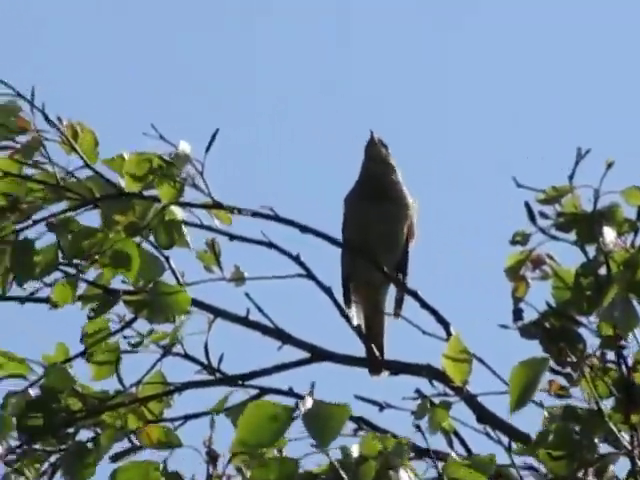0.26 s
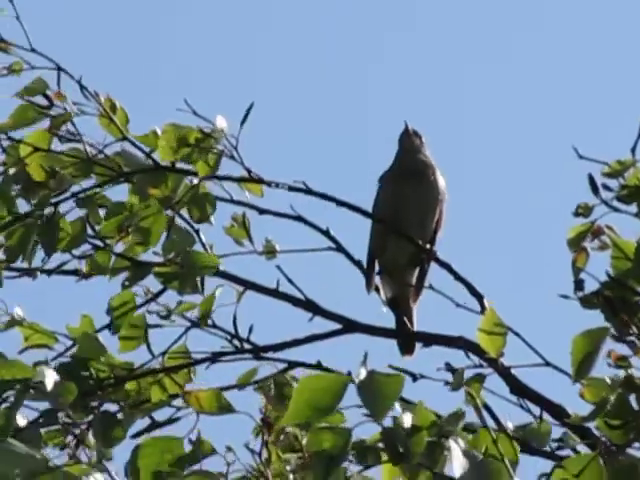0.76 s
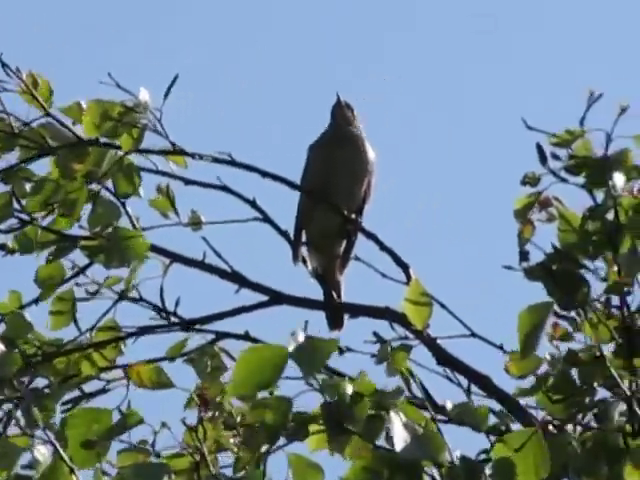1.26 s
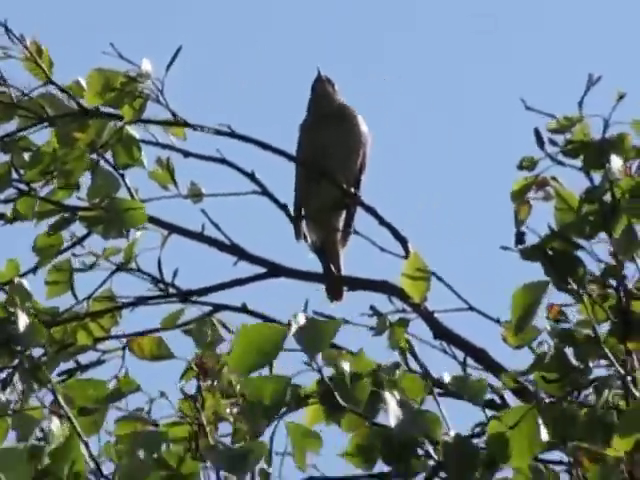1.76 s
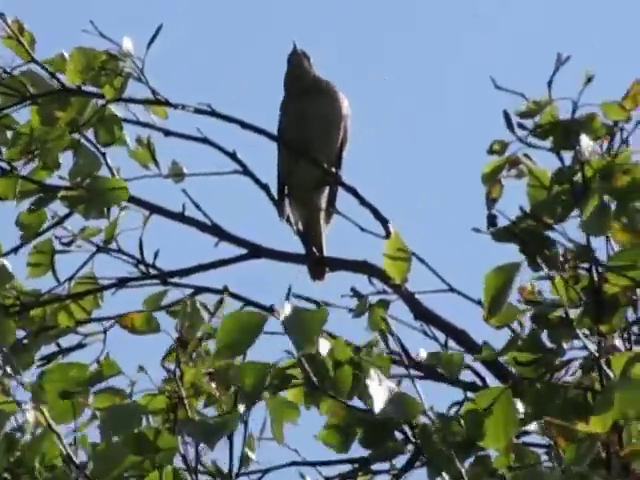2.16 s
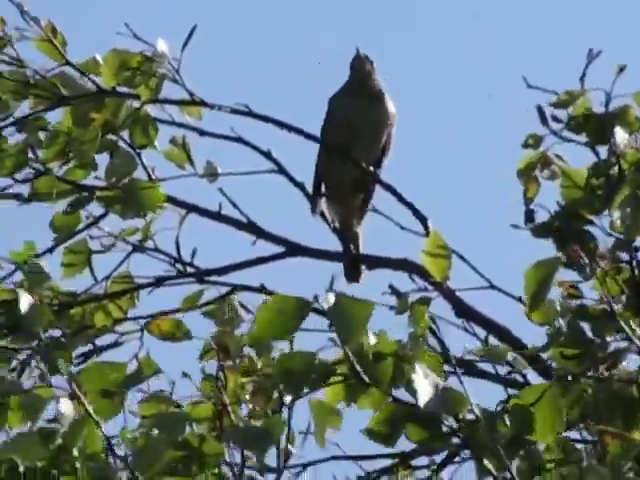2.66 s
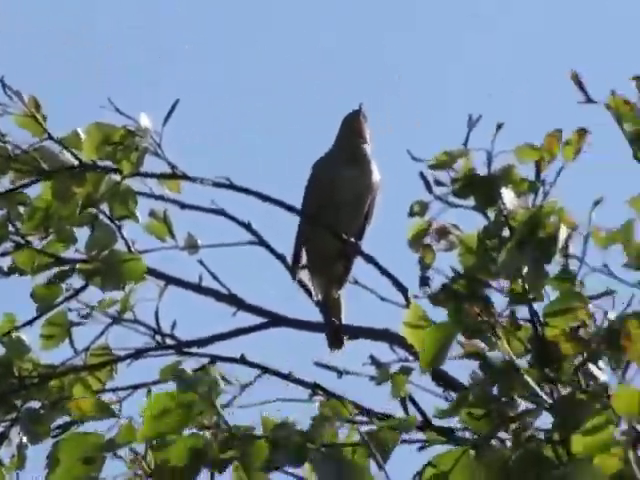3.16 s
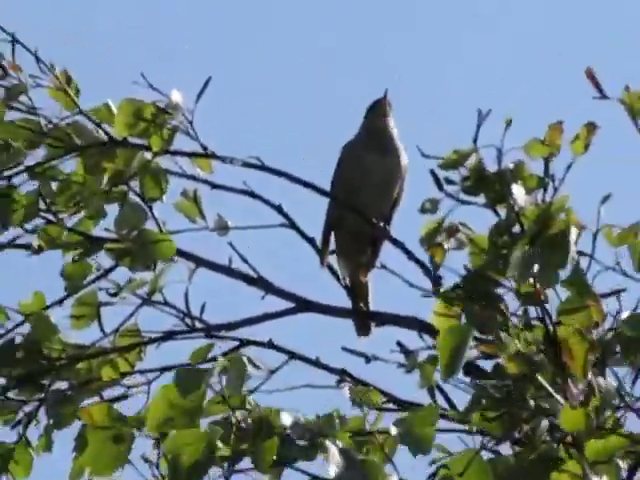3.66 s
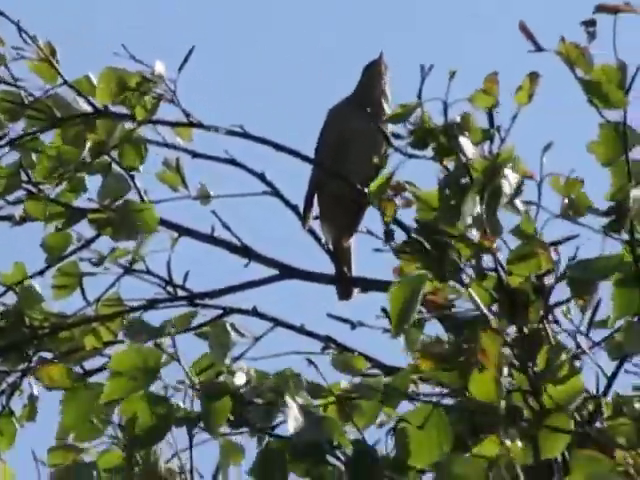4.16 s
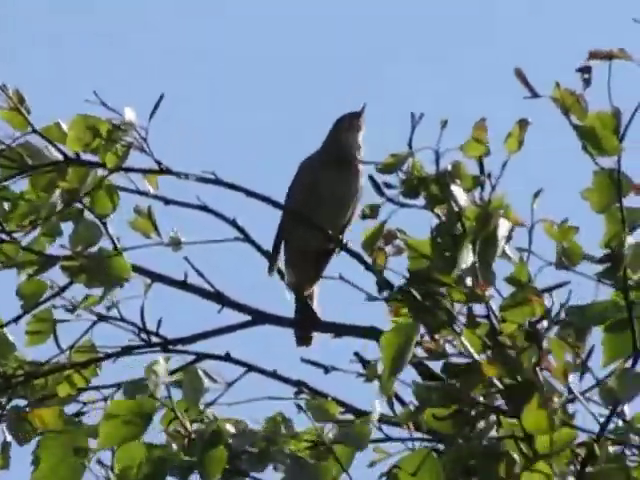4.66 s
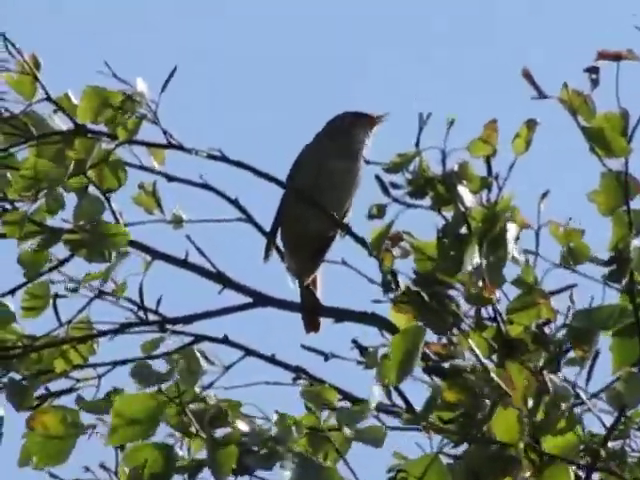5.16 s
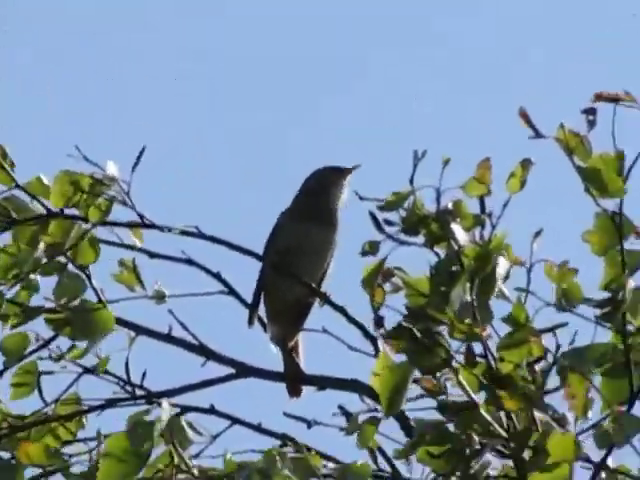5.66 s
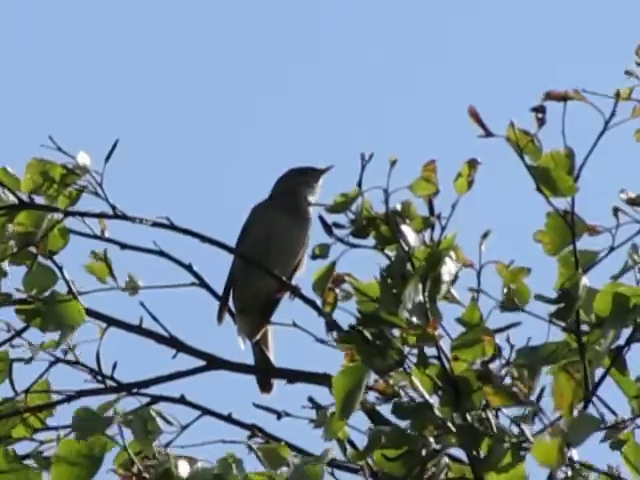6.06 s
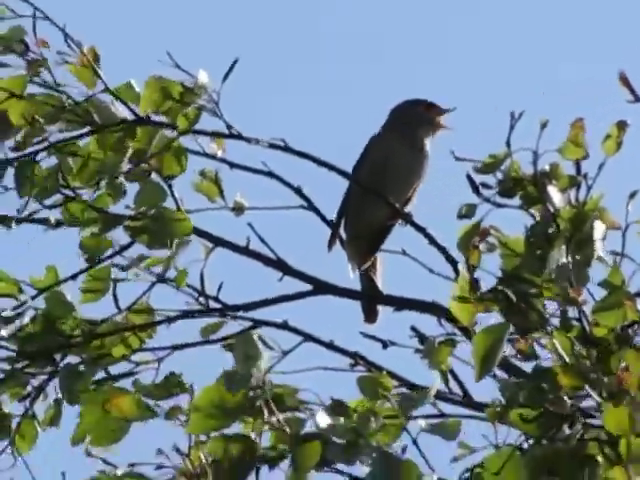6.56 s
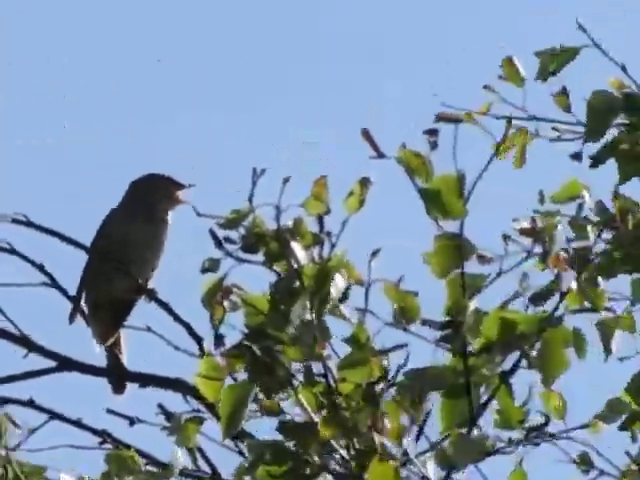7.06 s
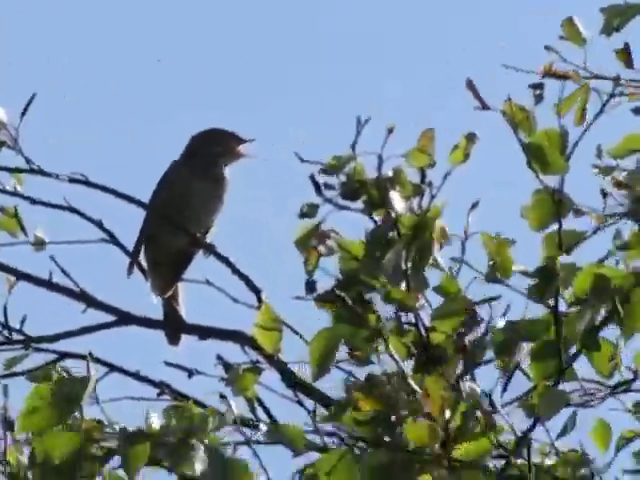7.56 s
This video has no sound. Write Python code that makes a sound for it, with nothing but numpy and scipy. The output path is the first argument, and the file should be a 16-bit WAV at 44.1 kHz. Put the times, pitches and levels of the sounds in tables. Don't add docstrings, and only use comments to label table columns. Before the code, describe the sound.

Low distant traffic rumble with a faint engine hum and soft airy leaf hiss runs throughout. From 0 to about 2.9 s, far birds sing quick short gliding whistles and chirps, blurred by trees and slightly left. At 3.1-3.6 s fabric brushes the microphone in several crackly strokes with small knocks; faint ticks follow near 3.95 and 5.9 s. The close songbird begins at 3.2 s with a tiny chip and a soft, very high swelling whistle, repeated louder at 3.8 and 4.8 s. Between them, at 4.2 s, comes a lower whistle flicking upward, then two soft tucks at 4.65 s. Paired, fast-falling chucks sound at 5.2, 5.6 and 5.9 s. From 6.15 s to the end, a loud dry rattle alternates bright clicks and short buzzes ending in hard snaps, about fourteen strokes per second, with brief woodland reverberation.

```python
import sys
import numpy as np
from scipy import signal
from scipy.fft import rfft, irfft, next_fast_len
from scipy.io import wavfile
from scipy.ndimage import uniform_filter1d

SR = 44100
rng = np.random.default_rng(int(sys.argv[2]) if len(sys.argv) > 2 else 0)


def store_wav(level_fs):
    pcm = np.round(np.clip(np.atleast_2d(level_fs), -1, 1) * 32767)
    wavfile.write(sys.argv[1], SR, pcm.T.astype(np.int16))


def volts(x):
    e = np.asarray(x, float) / 20
    return 10 ** e


N = 344862
LEFT_RIGHT = np.array([[.5], [-.5]])


def at_hz(points, hz, column=1):
    rows = np.array(points)
    return np.interp(np.log(hz), np.log(rows[:, 0]), rows[:, column])


def rms_one(x):
    return x / np.sqrt(np.mean(x ** 2) + 1e-20)


def drift(rate_per_s):
    steps = int(N / SR * rate_per_s) + 3
    knots = np.interp(np.arange(N) * rate_per_s / SR, np.arange(steps), rng.standard_normal(steps))
    return rms_one(uniform_filter1d(knots, int(SR / rate_per_s / 2)))


def shape(x, gain):
    size = next_fast_len(N + SR)
    hz = np.maximum(np.arange(size // 2 + 1) * SR / size, 1)
    return irfft(rfft(x, size) * gain(hz), size)[..., :N]


def butter(x, order, hz, kind="low"):
    return signal.sosfilt(signal.butter(order, hz, kind, fs=SR, output="sos"), x)


def ring(x, hz, width_hz):
    r = np.exp(-np.pi * width_hz / SR)
    poles = [1, -2 * r * np.cos(2 * np.pi * hz / SR), r * r]
    return signal.lfilter(np.array([1, 0, -1]) * (1 - r * r) / 2, poles, x)


def ring_twice(x, hz, width_hz, second_width_hz):
    return ring(ring(x, hz, width_hz), hz, second_width_hz)


def add(out, start_s, sound):
    i = round(start_s * SR)
    out[..., i:i + sound.shape[-1]] += sound[..., :N - i]


def partial(pitch_hz, k):
    return np.sin(k * 2 * np.pi * np.cumsum(pitch_hz) / SR) * (k * pitch_hz < .4 * SR)


def wide_noise(spectrum):
    # hz, correlation
    likeness = [(60, 0.88), (130, 0.96), (290, 0.93), (640, 0.52), (1410, 0.26), (3100, -0.13),
                (6820, -0.065), (15000, -0.17)]
    mid, side = rng.standard_normal((2, N))

    def colour(hz, sign):
        alike = np.clip(at_hz(likeness, hz), -1, 1)
        return volts(at_hz(spectrum, hz)) * np.sqrt(1 + sign * alike)

    mid = shape(mid, lambda hz: colour(hz, 1))
    side = shape(side, lambda hz: colour(hz, -1))
    return rms_one(np.array([mid + side, mid - side]))


def background():
    # time_s, level_db
    traffic = [(0.0, -50), (0.43, -48.5), (0.94, -47), (1.72, -47.5), (2.46, -51), (3.05, -47), (3.94, -50),
               (4.55, -50), (5.62, -45), (6.32, -49.5), (6.45, -50.5), (7.34, -53), (7.6, -50), (7.82, -51)]
    # hz, db per Hz
    rumble_colour = [(12, -32), (20, -7), (86, -1.5), (109, -0.5), (133, -13), (172, -2), (221, -10.5),
                     (255, -6), (312, -14.5), (347, -15), (586, -23), (872, -16), (955, -21.5),
                     (1140, -18.5), (1500, -37.5), (1950, -61), (3300, -120)]
    # hz, db per Hz
    air_colour = [(880, -37.5), (1500, 0), (2070, -2.5), (4370, -3), (5020, -5.5), (5550, -6.5),
                  (11700, -15), (15100, -20.5), (16300, -36)]
    # pitch_hz, level_db, wander_share
    engines = [(82.2, -52, 0.0986), (183.7, -51.5, 0.071), (263, -82, 0.073), (873, -63, 0.012)]
    # pitch_hz, level_db, wander_share
    whine = (11500, -92, .002)
    time_s, level_db = np.transpose(traffic)
    swell_db = np.interp(np.arange(N) / SR, time_s, level_db - level_db.mean())
    hum = np.zeros(N)
    for hz, db, share in engines + [whine]:
        level = volts(db + 1.5 * drift(2.39))
        hum += level * partial(hz * (1 + share * drift(14)), 0.99)
    rumble = volts(-44.5) * wide_noise(rumble_colour)
    air = volts(-58.5 + .7 * drift(.4)) * wide_noise(air_colour)
    return volts(0.48 * swell_db) * (rumble + hum) + air


def scatter(x, wet_db, stretch, onset_s):
    # hz, level_db, t60_s
    foliage = [(980, -7.5, 0.63), (1980, -3, 0.36), (4500, -1.5, 0.32), (7000, -3, 0.29),
               (10300, -3.5, 0.38), (14000, -22, 0.17)]
    # delay_s, smear_s, top_hz, level_db
    trunks = [
        (.0125, .003, 2500, -10),
        (.022, .006, 5000, -21),
        (.04, .016, 2500, -14),
    ]
    late_db, late_stretch = -16.5, 2.26
    sway_per_s, sway_radians = 3.5, 1.6
    t = np.arange(SR // 2) / SR
    white = rng.standard_normal((2, 2, SR // 2))
    tail = np.zeros((2, 2, SR // 2))
    edges_hz = 700 * 2 ** np.arange(0, 4.6, .5)
    for low_hz, high_hz in zip(edges_hz, edges_hz[1:]):
        hz = np.sqrt(low_hz * high_hz)
        t60_s = stretch * at_hz(foliage, hz, column=2)
        decay = volts(-60 * t / t60_s) + volts(late_db - 60 * t / t60_s / late_stretch)
        decay = decay * np.minimum(t / onset_s, 1) * np.sqrt(14 / t60_s / SR)
        tail += butter(white, 2, [low_hz, high_hz], "band") * volts(at_hz(foliage, hz)) * decay
    for delay_s, smear_s, top_hz, db in trunks:
        echo = white[..., ::-1] * np.exp(-((t - delay_s) / smear_s) ** 2 * 4)
        tail += volts(db) * butter(echo / np.sqrt(smear_s * SR / 2), 2, top_hz)
    sway = sway_radians * drift(sway_per_s)
    shares = x * np.array([np.cos(sway), np.sin(sway)])
    return volts(wet_db) * signal.fftconvolve(shares[:, None], tail, axes=2).sum(axis=0)[:, :N]


def far_birds():
    # start_s, length_s, start_hz, end_hz, level_db
    single_notes = [(0.053, .035, 3940, 4040, -57.5), (0.073, .025, 4290, 5950, -65),
                    (0.122, 0.053, 6050, 5956, -63.5), (.485, 0.054, 4730, 4860, -57),
                    (1.277, 0.067, 3500, 4210, -49.5), (1.73, 0.033, 4370, 4150, -57.5),
                    (1.962, .02, 3200, 2450, -58), (1.997, 0.037, 3770, 3530, -52.5),
                    (2.05, 0.14, 2550, 2510, -72), (2.086, .035, 3230, 2720, -59),
                    (2.119, 0.055, 3796, 3920, -56.5), (2.722, 0.051, 4080, 4080, -74),
                    (2.851, .22, 4914, 4784, -67), (2.385, 0.02, 4280, 4300, -68),
                    (3.962, 0.049, 2950, 3710, -68), (4.185, .04, 2980, 3340, -65),
                    (5.456, 0.087, 3640, 3760, -70.5)]
    # length_s, start_hz, middle_hz, end_hz
    hook = (.045, 4050, 4120, 4740)
    fall = (.081, 5050, 4200, 3800)
    sweep = (.055, 2850, 3900, 5720)
    crest = (.045, 5600, 5800, 5720)
    slur = (.13, 2900, 3255, 3780)
    dip = (.053, 4080, 3430, 2900)
    drop = (.019, 2920, 2330, 1740)
    pip = (.026, 5280, 4950, 4700)
    swoop = (.029, 5220, 4780, 3700)
    arch = (.075, 3660, 4000, 3500)
    bowl = (.165, 3250, 2560, 3150)
    # start_s, level_db
    hooks = [(0.213, -55.5), (0.344, -52)]
    falls = [(0.523, -53), (0.689, -52.5)]
    slurs = [(1.508, -54.5), (1.763, -55)]
    sweeps = [(.844, -52.5), (0.994, -52), (1.144, -52)]
    dips = [(1.328, -52), (3.898, -79), (4.119, -67.5)]
    drop_pairs = [(.345, -58), (.651, -55.5), (0.924, -54.5), (1.215, -56)]
    drops = [(1.49, -62), (1.738, -56)]
    pips = [(2.03, -70), (2.175, -67), (2.32, -64), (2.465, -64), (2.61, -62), (2.757, -65)]
    swoops = [(5.868, -64.5), (6.041, -63)]
    bowls = [(2.228, -59)]

    def after(plays, gap_s, db):
        return [(s + gap_s, level_db + db) for s, level_db in plays]

    song = [(hook, hooks), (bowl, bowls), (fall, falls), (slur, slurs), (dip, dips), (pip, pips),
            (sweep, sweeps), (crest, after(sweeps, sweep[0], -10)),
            (swoop, swoops), (arch, after(swoops, swoop[0], 7.5)),
            (drop, drops + drop_pairs + after(drop_pairs, .046, 0))]
    notes = [(s, *syllable, db) for syllable, plays in song for s, db in plays]
    notes += [(s, length_s, a, (a + b) / 2, b, db) for s, length_s, a, b, db in single_notes]
    out = np.zeros(N)
    for s, length_s, start_hz, middle_hz, end_hz, db in notes:
        u = np.linspace(0, 1, round(length_s * SR))
        pitch_hz = np.polyval(np.polyfit([0, .5, 1], [start_hz, middle_hz, end_hz], 2), u)
        add(out, s, partial(pitch_hz, 1) * signal.windows.tukey(len(u), .3) * volts(db - 4 * u))
    leafy = butter(out, 2, 2800, "high")
    wet = scatter(leafy, wet_db=15.0, stretch=1.58, onset_s=0.004)
    return (volts(2.0) * out + wet) * volts(np.array([[3.5], [-2.5]]))


def handling():
    # start_s, peak_s, end_s, peak_db, brightness_db
    strokes = [
        (3.112, 3.145, 3.22, -49.5, -18.5),
        (3.207, 3.21, 3.29, -48.5, -14.5),
        (3.29, 3.436, 3.47, -41.5, -16.5),
        (3.556, 3.595, 3.64, -42, -41),
    ]
    # peak_s, peak_db, brightness_db, left_right_db
    ticks = [(3.125, -38, -10, 32.5), (3.144, -51, -14, -1), (3.16, -33, -22, 2), (3.218, -28, -16.5, -4.5),
             (3.325, -35, -10, 13), (3.415, -41.5, -22, 21), (3.434, -39.5, -16, 12), (3.584, -32, -37, -1),
             (3.601, -30.5, -26, 14), (3.615, -38.5, -16, -6.5), (3.948, -37, -42, -7),
             (3.975, -38, -40, -2), (5.874, -30.5, -45.5, 2.5)]
    # hz, width_hz, level_db
    housing = [(755, 198, 9), (926, 53, 5.5), (1500, 1100, -47)]
    dull, bright, crisp = np.zeros((3, 2, N))
    grains = rng.standard_normal((2, N)) * volts(0.91 * np.minimum(rng.exponential(1, N), 4))
    grains = grains * (rng.random(N) < .11)
    grains = rms_one(grains + 0.16 * grains[::-1])
    for *s, db, shine_db in strokes:
        t = np.arange(s[0], s[-1], 1 / SR)
        piece = grains[:, round(s[0] * SR):][:, :len(t)]
        piece = piece * volts(db) * np.interp(t, s, [0, 1, 0]) ** 0.77
        dulling_db = -12 * np.linspace(-.5, .5, len(t))
        add(dull, s[0], piece * volts(13.5))
        add(bright, s[0], piece * volts(shine_db + 10 + dulling_db))
    i = np.arange(200)
    snaps = rng.standard_normal((len(ticks), 2, 200)) * np.exp(-i / 70) * np.minimum(i / 25, 1)
    for (s, db, shine_db, pan_db), snap in zip(ticks, snaps):
        snap = (snap + snap[::-1] * 0.12) * volts(db + pan_db * LEFT_RIGHT)
        add(dull, s, snap * volts(11.5))
        add(crisp, s, snap * volts(shine_db + 7))
    body = sum(volts(db) * ring(dull, hz, width_hz) for hz, width_hz, db in housing)
    fabric = volts(4 * LEFT_RIGHT) * butter(bright, 2, 6500)
    return body + fabric + ring(crisp, 2000, 2200) + volts(-30.5) * crisp


def held(start_s, length_s, hz, db, swell_db):
    sharp_hz, edge_db = hz * 1.032, -14
    attack_s, release_s = .012, .018
    return [(start_s, sharp_hz, db - swell_db + edge_db),
            (start_s + attack_s, sharp_hz, db - swell_db),
            (start_s + .4 * length_s, hz, db - .45 * swell_db),
            (start_s + length_s - release_s, hz, db),
            (start_s + length_s, hz * 1.025, db + edge_db)]


def whistles():
    # start_s, length_s, settled_hz, peak_db, swell_db
    high_whistles = [
        (3.275, 0.12, 6035, -23.5, 14.5),
        (3.868, 0.11, 5840, -17.5, 13),
        (4.88, 0.12, 5916, -15, 8.5),
    ]
    # time_s, pitch_hz, level_db
    low_whistle = [(4.205, 2706, -52), (4.232, 2586, -29.5), (4.265, 2547, -19.5), (4.3, 2564, -19),
                   (4.328, 2593, -23), (4.37, 2590, -29.5), (4.404, 4000, -21), (4.416, 4235, -16.5),
                   (4.428, 5010, -47)]
    # peak_s, pitch_hz, peak_db, second_partial_db, stretch
    chips = [
        (3.208, 7000, -30.5, -23, 0.92),
        (3.782, 6710, -22, -35.5, 1),
        (4.8, 7110, -17.5, -18.5, 1.05),
    ]
    # time from peak_s, pitch_ratio, level_db
    chip_shape = [
        (-.022, 1.0, -41.5),
        (-.014, 0.983, -14.5),
        (0, 1.0, 1.5),
        (.01, 1.1, -9),
        (.019, 1.11, -15.5),
        (.029, 1.07, -36),
    ]
    # multiple, level_db under the whistle
    overtones = [(3, -43), (4, -55.5), (5, -38), (6, -55)]
    # time_s, width_s, share of pitch
    hitches = [
        (3.323, 0.032, 0.0148),
        (4.939, 0.007, .017),
    ]
    beak_top_hz = 13400
    out, tremor = np.zeros(N), drift(45)
    notes = [(held(*row), -31) for row in high_whistles] + [(low_whistle, -31)]
    for peak_s, hz, db, second_db, stretch in chips:
        notes.append((np.array(chip_shape) * [stretch, hz, 1] + [peak_s, 0, db], second_db))
    for rows, second_db in notes:
        s, *columns = np.transpose(rows)
        t = np.arange(s[0], s[-1], 1 / SR)
        pitch_hz, level_db = [uniform_filter1d(np.interp(t, s, c), size=200) for c in columns]
        shake = tremor[round(s[0] * SR):][:len(t)]
        waver = sum(share * np.exp(-((t - at_s) / width_s) ** 2) for at_s, width_s, share in hitches)
        pitch_hz = pitch_hz * (1 + .002 * shake + waver)
        note = partial(pitch_hz, 0.99) + volts(second_db) * partial(pitch_hz, 2)
        for k, db in overtones:
            note += volts(db) * partial(pitch_hz, k) / (1 + (k * pitch_hz / beak_top_hz) ** 30)
        level = np.sqrt(2) * volts(level_db + .5 * shake)
        add(out, s[0], level * note * signal.windows.tukey(len(t), .06))
    return out


def pulses(events, body, from_hz, to_hz, start, rise, width_hz, rasp, lead):
    slap_uneven_db = 1.5
    body_spread = .07
    out, chance = np.zeros(N), rng.standard_normal((len(events), 2, 1600))
    puff = np.exp(-np.arange(60) / 18)
    for (peak_s, db, throat_hz, ms), (luck, air) in zip(events, chance):
        t = np.arange(0, ms / 1000, 1 / SR)
        turns = np.cumsum(from_hz * (to_hz / from_hz) ** (t / t[-1])) / SR
        at = np.interp(np.arange(int(turns[-1]) + 1), turns, np.arange(len(t)))
        force = np.interp(at / len(t), [0, rise, 1], [start, 1, .45])
        force = force * volts(slap_uneven_db * np.sqrt(rasp) * luck[:len(at)])
        slaps = force @ np.sinc(np.arange(len(t) + 400) - 8 - at[:, None])
        slaps = slaps + rasp * np.convolve(slaps, puff)[:len(slaps)] * air[:len(slaps)] / 2
        modes = [(throat_hz * (1 + body_spread / 2 * air[-1]), width_hz, 0)]
        for k, (hz, w, d) in enumerate(body):
            modes.append((hz * (1 + body_spread * luck[-1 - k]), w, d))
        burst = sum(volts(d) * (-1) ** k * ring_twice(slaps, hz, w, w * 2)
                    for k, (hz, w, d) in enumerate(modes))
        add(out, peak_s - lead * ms / 1000, volts(db) * burst / np.abs(burst).max())
    return out


def chucks():
    # start_s, peak_db
    pairs = [
        (5.2126, -13.5),
        (5.2975, -13.5),
        (5.5806, -12),
        (5.666, -13.5),
        (5.9196, -12),
        (6.0041, -12.5),
    ]
    lengths_s = [.037, .034]
    # multiple, level_db
    partials = [(1, 0.5), (2, -28), (3, -34.5), (4, -46), (5, -41)]
    # hz, width_hz, level_db
    beak_shine = (11700, 2300, -29)
    start_hz, floor_hz = 2114, 1024
    hold_db_per_s = 250
    out, shine = np.zeros((2, N))
    for (s, db), length_s in zip(pairs, lengths_s * 3):
        t = np.arange(0, length_s, 1 / SR)
        pitch_hz = floor_hz + (start_hz - floor_hz) * np.exp(-t / 0.016) + 350 * np.exp(-t / 0.0007)
        envelope = volts(db + 0.67 - 576 * t + 0.8 * np.exp(-t / 0.012))
        envelope = envelope * np.minimum(t / 0.0015, 1) * np.minimum((length_s - t) / 0.0018, 1)
        note = sum(volts(d + (k > 1) * hold_db_per_s * t) * partial(pitch_hz, k) for k, d in partials)
        high = sum(partial(pitch_hz, k) for k in range(5, 12))
        add(out, s - .0006, envelope * note)
        add(shine, s - .0006, envelope * volts(-250 * t) * high)
    hz, width_hz, db = beak_shine
    return out + volts(db) * ring_twice(shine, hz, width_hz, width_hz)


def rattle():
    # peak_s, peak_db, throat_hz
    clicks = [(6.201, -19.5, 5750), (6.2455, -11, 5000), (6.3842, -7.5, 4900), (6.5256, -7, 5170),
              (6.6638, -6.5, 5150), (6.8015, -4.5, 5130), (6.9357, -5.5, 5000), (7.0705, -9.5, 5100),
              (7.2094, -7.5, 4700), (7.354, -7, 5050), (7.4999, -9, 4840), (7.639, -8, 4870),
              (7.7932, -8.5, 4540)]
    # click_s, click_db, buzz_db
    hard_clicks = [(6.168, -4, -17), (6.3129, -5, -14.5), (6.4536, -3.5, -13.5), (6.593, -4.5, -13.5),
                   (6.7315, -2, -15), (6.8674, -3.5, -14), (7.002, -2.5, -14.5), (7.138, -4, -17),
                   (7.2764, -5.5, -16.5), (7.4237, -5.5, -13.5), (7.5672, -3, -15), (7.7072, -3.5, -16.5)]
    # peak_s, peak_db, throat_hz, length_ms
    tucks = [
        (4.645, -29.5, 1850, 6.5),
        (4.6595, -23, 1420, 2.2),
    ]
    # hz, width_hz, level_db
    click_body = [(1700, 380, -17), (3130, 1280, -13.5), (6430, 1570, -16), (12000, 630, -17.5)]
    hard_body = [(2250, 2740, -17.5), (3320, 1000, -39), (7000, 2550, -20.5), (10930, 16000, -23.5)]
    buzz_body = [(2160, 2500, -14.5), (5200, 1600, -46), (10100, 3000, -36)]
    lone = [(*row, 4.2) for row in clicks]
    hard = [(s, db, 4730, 4.7) for s, db, _ in hard_clicks]
    buzzes = [(s - .0112, db, 4110, 15) for s, _, db in hard_clicks]
    song = pulses(lone, click_body, from_hz=1200, to_hz=1133, start=.5, rise=0.47,
                  width_hz=1640, rasp=.45, lead=0.09)
    song += pulses(hard, hard_body, from_hz=1300, to_hz=1187, start=.5, rise=0.46,
                   width_hz=1530, rasp=.45, lead=.12)
    song += pulses(buzzes, buzz_body, from_hz=680, to_hz=1287, start=.2, rise=0.72,
                   width_hz=1070, rasp=.09, lead=.9)
    song += pulses(tucks, [(3300, 1200, -24)], from_hz=750, to_hz=604, start=.5, rise=0.3,
                   width_hz=670, rasp=.09, lead=0.065)
    return 1.1 * np.tanh(song / 1.1)


def singer():
    # hz, left_right_db
    balance = [(1500, 0), (2600, -1), (4200, 2.5), (5900, -0.7), (7200, 1), (12000, 0.8)]
    song = butter(rattle() + chucks(), 6, 13600)
    pure = whistles()

    def capsules(hz):
        delay = np.exp(-2j * np.pi * hz * LEFT_RIGHT / SR)
        return volts(LEFT_RIGHT * at_hz(balance, hz)) * delay

    wet = scatter(song + volts(0.5) * pure, wet_db=-3.5, stretch=0.83, onset_s=0.0013)
    return shape(song + pure, capsules) + wet


def scene():
    return background() + far_birds() + handling() + singer()


def roll_off(x):
    return signal.sosfilt(signal.butter(12, 16480, fs=SR, output="sos"), x)


def record(dry):
    return roll_off(dry)


dry = scene()
out = record(dry)
store_wav(out)
```